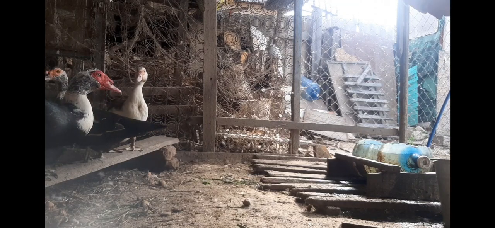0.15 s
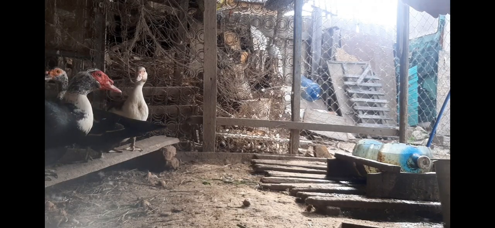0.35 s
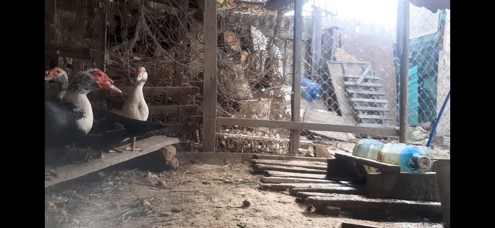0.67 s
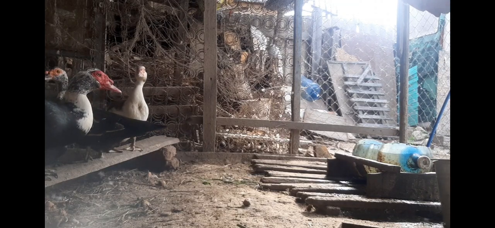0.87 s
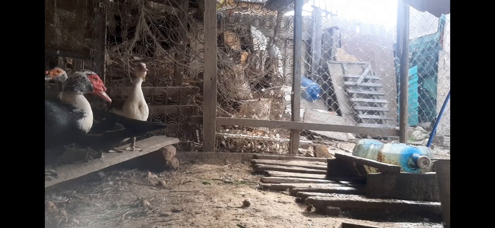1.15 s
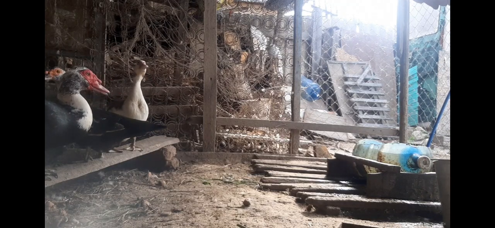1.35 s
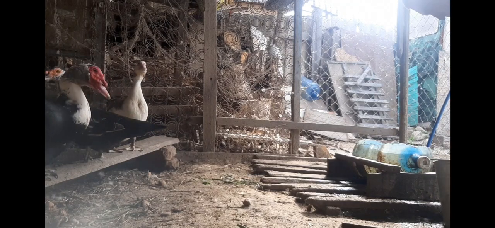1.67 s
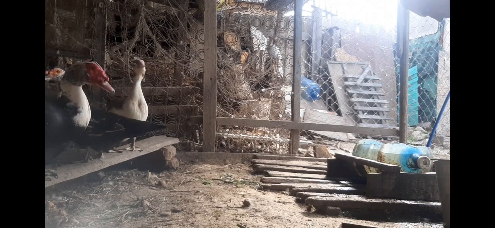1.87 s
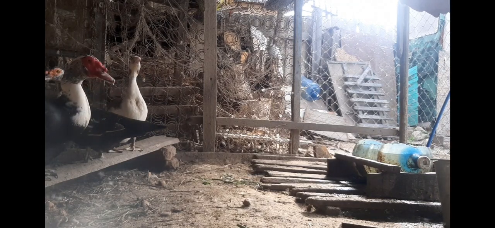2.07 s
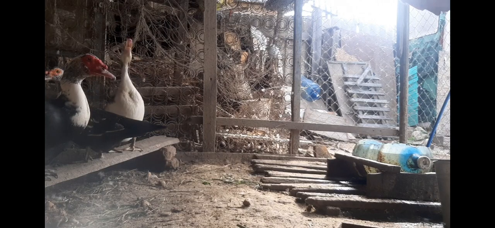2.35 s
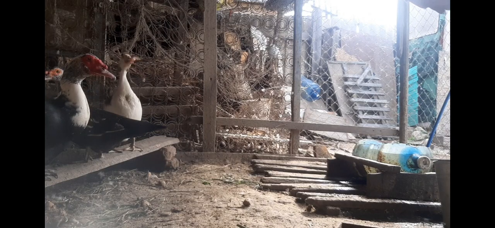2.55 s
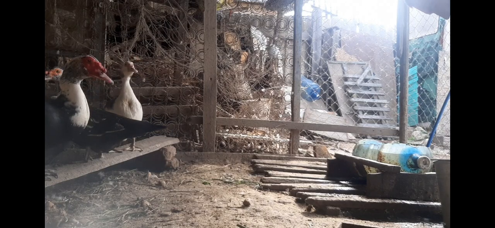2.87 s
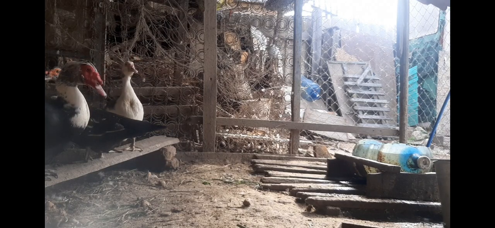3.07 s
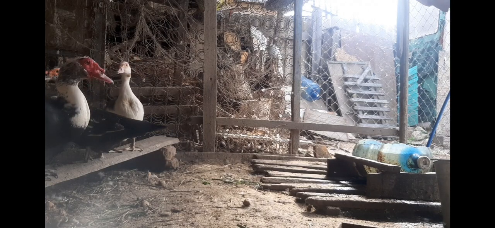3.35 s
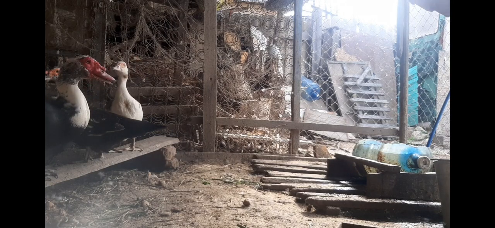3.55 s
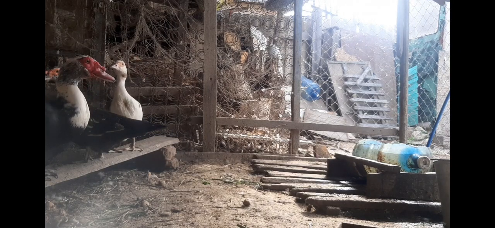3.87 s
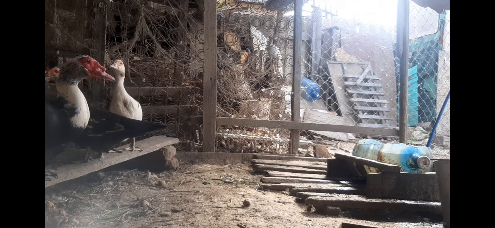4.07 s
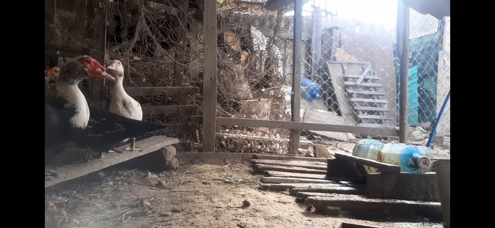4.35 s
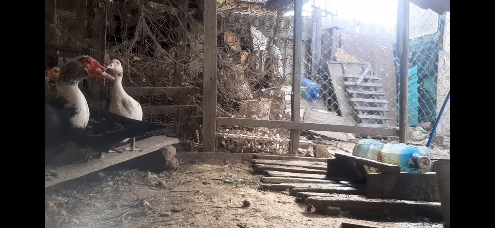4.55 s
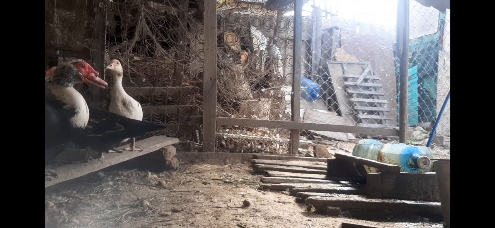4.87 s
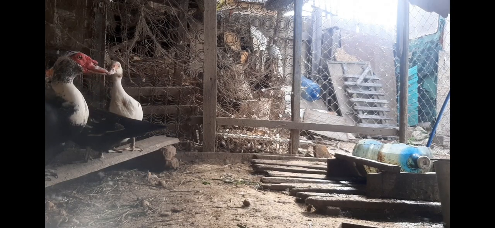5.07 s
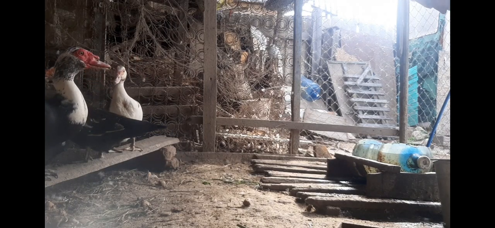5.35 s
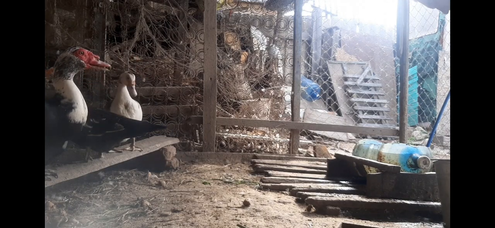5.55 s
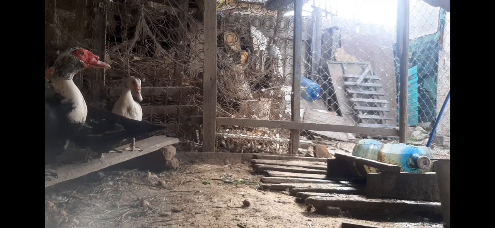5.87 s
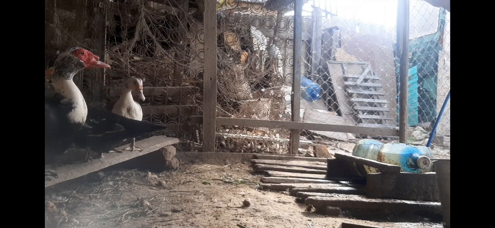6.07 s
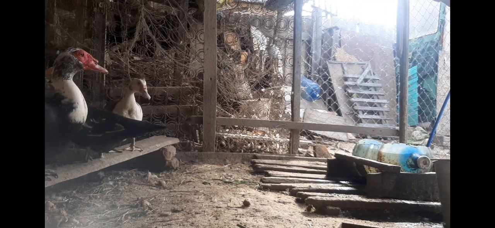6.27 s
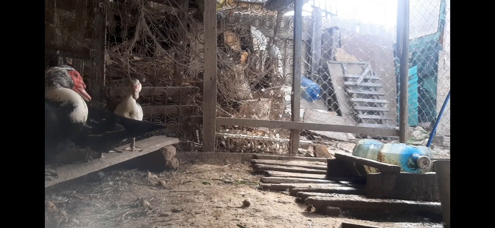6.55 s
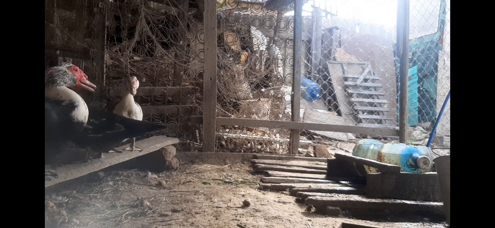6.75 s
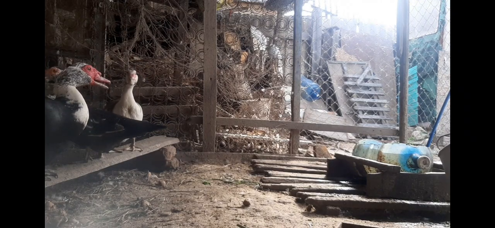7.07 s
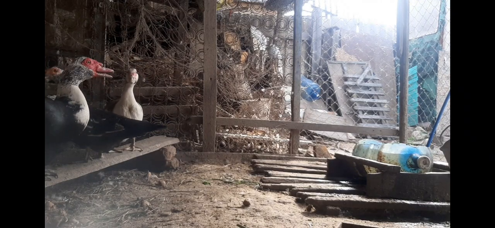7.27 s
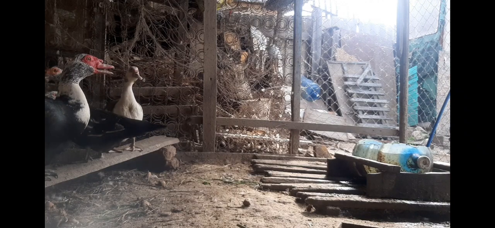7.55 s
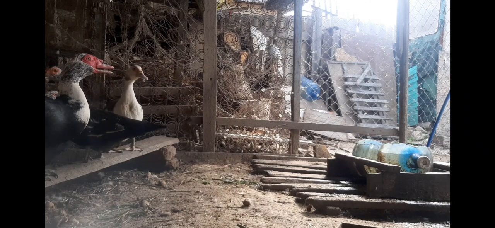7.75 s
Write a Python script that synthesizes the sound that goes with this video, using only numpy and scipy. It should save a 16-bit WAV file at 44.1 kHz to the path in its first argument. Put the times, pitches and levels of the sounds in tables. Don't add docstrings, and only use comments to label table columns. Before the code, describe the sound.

In a small wooden shed, feed is stirred in a plastic pail close to a stereo microphone, a little to the right. A hollow knock lands at once, with grainy hissing strokes through the first half second, then quieter rustling with tiny wet pops. Two dull knocks come at about 1.6 and 1.75 s, a longer gritty sweep near 2.1, and another thud with spilling grain at 2.8. Softer scrapes and digs follow from 3 to 4.5 s. A strong knock at 5.0 leads into a dense hissing scrape and firm dig until about 5.5. It thins out; a soft low footfall shakes the boards near 6.5. From 6.9 to 7.8 s the scoop taps the rim five times, roughly every 0.2 s, loudest around 7.3, the last lighter and brighter. Distant traffic rumbles throughout under very faint fowl murmur; the room tail is short and dry.

```python
import sys
import numpy as np
from scipy import signal
from scipy.fft import rfft, irfft
from scipy.io import wavfile

SR = 44100
rng = np.random.default_rng(int(sys.argv[2]) if len(sys.argv) > 2 else 0)


def natural_amplitude(level_db):
    exponent = np.asarray(level_db, float) / 20
    return 10 ** exponent


def dump_mix(stems):
    frames = np.atleast_2d(stems).T
    limited = np.clip(frames, -1, 1)
    pcm = np.round(limited * 32767).astype(np.int16)
    wavfile.write(sys.argv[1], SR, pcm)


N = 348816

# f/Hz, level/dB per Hz
AIR_SPECTRUM = [(71, -16), (120, 0.5), (228, -21), (333, -6), (726, -24), (1780, -18), (4160, 9),
                (6310, -22), (7500, -9), (9750, -51), (16500, -120)]
AIR_DB = -58
# t/s, level/dB
TRAFFIC = [(0.0, -56), (0.51, -56), (0.81, -64), (1.1, -58), (2.38, -60), (2.71, -59.5), (3.52, -55),
           (4.49, -59.5), (4.89, -56.5), (5.0, -53), (6.1, -57), (6.17, -57), (6.78, -56), (7.42, -51),
           (7.6, -52.5), (7.91, -60)]
MIDDLE_DB, UPPER_DB = -7.5, -20.5
# t/s, hold/s, middle band level/dB, upper band against it/dB
DRONES = [
    (0.1, 0.67, -58, -17),
    (1.65, 0.24, -59, -31),
    (3.5, 0.61, -69.5, -0.5),
    (4.1, 0.38, -63, -13),
    (4.85, 0.24, -59, -10),
    (5.4, 0.21, -55, -11),
    (7.1, .75, -60.5, -7.5),
]
DRONE_FADE_DB_PER_S = 58
# t/s, peak level/dB, f/Hz, t60/s
FOOTFALL = [
    (6.482, -29, 72, 0.21),
    (6.528, -36, 86, 0.33),
]

# t/s, hiss level/dB
IDLING = [(0, -60), (0.9, -60), (1.3, -60), (1.4, -66), (1.55, -63), (2.4, -64), (3.2, -63), (3.6, -63),
          (4.3, -61), (4.75, -63), (5.75, -62), (6.3, -61), (6.85, -60), (7.05, -66), (7.91, -68)]
IDLING_RASP_DB = -3
# t/s at full strength, hold/s, hiss level/dB, rasp against hiss/dB
SWEEPS = [(0.0, 0.1, -44.5, -2.5), (0.335, .11, -44, 0.5), (0.66, 0.062, -60, -16),
          (0.75, 0.023, -55.5, -1.5), (1.03, .015, -60.5, -4), (1.11, 0.033, -60, 8),
          (1.26, 0.023, -58, -5), (1.47, 0.041, -60, -17), (1.715, 0.045, -47.5, -3),
          (2.06, 0.15, -47.5, 0), (2.4, .02, -64.5, 2.5), (2.635, 0.042, -52, 0.5), (2.94, 0.05, -53, 3),
          (3.07, 0.038, -48, -3), (3.34, 0.048, -59, 2), (3.75, 0.16, -59, -1), (4.2, 0.026, -55, 1.5),
          (4.47, 0.064, -47, -4), (4.84, 0.068, -60, 3.5), (5.2, 0.32, -52, -1.5), (6.05, 0.057, -54, -4.5),
          (6.19, 0.024, -60, 1), (6.42, 0.022, -59.5, -2), (6.7, 0.019, -59.5, 7.5), (7.3, 0.018, -63, -16),
          (7.89, .03, -54.5, 10)]
SWEEP_RISE_DB_PER_S, SWEEP_FALL_DB_PER_S = 115, 195
# t/s, hold/s, hiss level/dB, rasp against hiss/dB
SPILLS = [(0.09, 0.011, -52.5, -1), (0.14, 0.15, -61.5, 13), (0.56, 0.0072, -61, -7),
          (1.605, 0.033, -52, 1), (1.8, 0.031, -55, 4), (1.885, 0.014, -57.5, 8), (2.29, 0.0063, -53.5, 0),
          (2.47, .01, -61, -22), (2.52, 0.016, -56, -24), (2.8, 0.015, -44, -1.5), (3.432, 0.062, -49.5, 4),
          (3.97, 0.056, -49.5, 1.5), (4.99, 0.069, -46.5, 0), (5.045, 0.035, -42, -1.5),
          (5.395, .11, -42, -3), (5.59, 0.02, -57.5, 4), (5.97, 0.022, -54.5, -4),
          (6.24, 0.018, -58.5, -15), (6.94, 0.033, -51.5, 3), (7.2, 0.013, -56.5, 8), (7.41, 0.016, -54, 7),
          (7.61, 0.037, -53.5, 9), (7.85, 0.032, -58, 11)]
SPILL_RISE_DB_PER_S, SPILL_FALL_DB_PER_S = 696, 143
# f/Hz, level/dB per Hz
GRAIN_SPECTRUM = [(880, -31), (1500, -4.5), (1890, -11), (2090, -7), (2880, -4.5), (3210, -4.5), (5390, -9),
                  (6920, -13.5), (7500, -22.5), (9750, -24.5), (16500, -120)]
# f/Hz, level/dB per Hz
RASP_SPECTRUM = [(76, 1), (130, -12), (351, 9.5), (884, -1), (1030, 1), (1200, -2), (1520, -4), (2200, -7),
                 (2860, -61), (4840, -120)]
# f/Hz, width/Hz, level/dB
HOLLOWS = [(415, 59, -8), (663, 59, -2), (1070, 29, -28), (1560, 22, -32), (2050, 8.7, 0.5), (2420, 38, -5),
           (2690, 38, 1)]

# t/s, thud peak level/dB, thud f/Hz, wall against thud/dB, crack against thud/dB
KNOCKS = [(0.059, -18.5, 355, -16.5, -15), (0.336, -37.5, 676, -8, 4.5), (0.535, -49, 640, 10.5, 14.5),
          (1.593, -19, 429, -43, -30), (1.752, -20, 333, -13.5, -9.5), (2.476, -71, 684, -3, 0),
          (2.78, -18, 345, -23, -14.5), (3.427, -37, 332, -6.5, -8.5), (4.984, -16, 408, -20, -19),
          (5.953, -40, 362, -11, 6), (6.915, -17.5, 415, -10, -23.5), (7.122, -10.5, 482, -9, -12),
          (7.337, -6.5, 483, -10, -18.5), (7.552, -10.5, 504, -4, -10), (7.779, -23, 1000, 11.5, -2.5)]
# t/s, thud peak level/dB, thud f/Hz, wall and crack against thud/dB
DIGS = [
    (1.094, -39.5, 412, 0.5, -4),
    (1.705, -46.5, 382, -14, 13.5),
    (2.755, -31.5, 257, -20.5, 2),
    (3.964, -40, 700, -32, 3),
    (3.985, -29, 408, -15, -25),
    (5.394, -24.5, 430, -17, -19),
]
KNOCK_RISE_S, DIG_RISE_S = 0.00034, 0.013
# f/Hz, level/dB, t60/s
WALL_MODES = [(918, -28, 0.018), (1035, -5, 0.057), (1128, -1, 0.036), (1190, -14, 0.0097),
              (1350, -9, 0.042), (1490, 6, 0.022), (1560, 11, 0.046), (1720, -2, 0.013), (2000, 13, 0.017),
              (2050, -1.5, 0.025), (2400, 3, 0.025), (2610, -52, 0.021), (2730, -44, 0.08)]
WALL_SPLIT_HZ = 1420
UPPER_WALL_SHARE, UPPER_WALL_DB = 0.22, -0.5
# f/Hz, level/dB, t60/s
BELLY_MODES = [(188, -11.5, 0.022), (292, -22, 0.16), (430, -4, 0.21), (490, -29, 0.062),
               (618, -1.5, 0.027), (684, -9.5, 0.113)]
# f/Hz, level/dB per Hz
CRACK_SPECTRUM = [(1410, -42), (2400, -33), (2880, -28.5), (3050, -15), (4000, -13.5), (4840, -10),
                  (6440, -7), (7500, -18.5), (9750, -34.5), (16500, -120)]

# t/s, peak level/dB, f/Hz
WET_POPS = [(0.725, -48.5, 690), (0.873, -50.5, 1370), (1.348, -54, 692), (2.079, -43.5, 1020),
            (2.147, -41.5, 680), (2.63, -49, 1560), (3.058, -49, 740), (3.499, -48, 1350),
            (3.876, -49, 730), (4.33, -49, 670), (4.749, -59, 1130), (5.441, -37, 1560), (5.489, -39, 1630),
            (6.038, -47.5, 1190), (6.11, -49.5, 636), (6.452, -54, 1490), (6.605, -55, 1590),
            (0.295, -40, 3260), (0.6094, -48, 2000), (1.3227, -48, 4720), (1.424, -50.5, 1980),
             (1.934, -43, 3200), (2.1185, -40.5, 2050), (2.2923, -48, 2040), (2.519, -45.5, 4090),
             (2.937, -40.5, 3300), (3.1824, -44, 2120), (3.3144, -46, 3680), (3.3528, -42, 3300),
             (3.5414, -48, 4200), (4.474, -39.5, 2200), (4.8258, -45, 4060), (5.3942, -31.5, 2370),
             (5.5998, -36, 3380), (5.6935, -44, 3210), (5.8252, -50, 3540), (5.8888, -42, 3570),
             (6.2446, -47, 4710), (1.026, -43.5, 1750), (6.7217, -35, 3180), (6.8083, -44, 2730),
             (7.2963, -44, 3540)]
POP_LEAD_S = 0.008

SHED_T60_S, SHED_DB, SHED_WIDE_HZ = 0.11, -1.5, 338
LEFT_LAG, RIM_LAG = 8, 10
# f/Hz, level/dB
RIGHT_LEAN = [(150, 3), (600, 3), (2500, 4.5), (5000, -0.27), (12000, -3)]
# f/Hz, level/dB
DIFFUSE = [(120, -29), (300, -7.5), (700, 7), (3000, 9), (12000, 20.5)]
# f/Hz, level/dB
SCENE_COLOUR = [(20, -59), (45, 1.5), (6800, 5.5), (7600, 3.5), (8500, -31.5), (9500, -12), (11000, -1),
                (15300, -3), (15900, -43), (17000, -70)]


def rms_one(x):
    return x / np.sqrt(np.mean(x ** 2) + 1e-20)


def in_time(rows):
    s, *columns = np.transpose(rows)
    return [np.interp(np.arange(N) / SR, s, c) for c in columns]


def band_filter(order, edges_hz, kind="band"):
    return signal.butter(order, edges_hz, kind, fs=SR, output="sos")


def colour(x, points):
    size = x.shape[-1]
    hz, db = np.transpose(points)
    bins_hz = np.arange(size // 2 + 1) * SR / size
    gain = natural_amplitude(np.interp(np.log(bins_hz + 1), np.log(hz), db))
    return irfft(rfft(x) * gain, size)


def drift(rate_hz):
    r = np.exp(-80 * np.pi * rate_hz / SR)
    noise = rng.standard_normal(N // 40 + 2002)
    slow = signal.lfilter([1], [1, -2 * r, r * r], noise)[2000:]
    return np.interp(np.arange(N) / 40, np.arange(len(slow)), rms_one(slow))


def ring(clicks, hz, t60):
    r, w = natural_amplitude(-60 / (t60 * SR)), 2 * np.pi * hz / SR
    return signal.lfilter([0, np.sin(w)], [1, -2 * r * np.cos(w), r * r], clicks + 1e-18)


def swells(rows, rise_db_per_s, fall_db_per_s):
    s, hold, db, second_db = np.transpose(rows)[:, :, None]
    t = np.arange(0, N, 32) / SR
    rise_db = rise_db_per_s * np.maximum(s - t, 0)
    fall_db = fall_db_per_s * np.maximum(t - s - hold, 0)
    first_db = db - rise_db - fall_db
    powers = [np.sum(natural_amplitude(2 * d), axis=0) for d in (first_db, first_db + second_db)]
    return np.array([np.interp(np.arange(N) / SR, t, p) for p in powers])


def direct(x, lag=LEFT_LAG):
    return np.stack([np.roll(x, lag), x])


def with_diffuse(x):
    return direct(x) + colour(rng.standard_normal((2, N)), DIFFUSE)


def yard():
    air = colour(with_diffuse(rng.standard_normal(N)), AIR_SPECTRUM[:-2])
    murmur = 0
    for hz in np.geomspace(600, 5400, 18):
        opening = np.clip(drift(14) - 0.6, 0, 1.4)
        murmur = murmur + opening * rms_one(ring(rng.standard_normal(N), hz, 0.012))
    return natural_amplitude(AIR_DB - 3) * rms_one(air) + natural_amplitude(AIR_DB - 8) * direct(murmur)


def rumble():
    bands_hz = [(43.2, 59.7), (76.4, 102.7), (130, 164), (40, 156)]
    noise = rng.standard_normal((4, N + SR))
    *bands, side = [rms_one(signal.sosfilt(band_filter(2, hz), n)[SR:]) for hz, n in zip(bands_hz, noise)]
    deep_db, = in_time(TRAFFIC)
    steady = natural_amplitude(2 * (deep_db + [[MIDDLE_DB], [UPPER_DB]]))
    drone = swells(DRONES, DRONE_FADE_DB_PER_S, DRONE_FADE_DB_PER_S)
    levels_db = [deep_db, *10 * np.log10(steady + drone)]
    low = sum(natural_amplitude(db) * band for db, band in zip(levels_db, bands))
    step = sum(natural_amplitude(db) * ring(np.arange(N) == round(s * SR), hz, t60) for s, db, hz, t60 in FOOTFALL)
    low += signal.sosfilt(band_filter(3, 125, "low"), step)
    return low * natural_amplitude([[-1.2], [1.1]]) + natural_amplitude(levels_db[1] - 14) * side * [[1], [-1]]


def hand():
    power = natural_amplitude(2 * (in_time(IDLING)[0] + [[0], [IDLING_RASP_DB]]))
    power = power + swells(SWEEPS, SWEEP_RISE_DB_PER_S, SWEEP_FALL_DB_PER_S)
    power = power + swells(SPILLS, SPILL_RISE_DB_PER_S, SPILL_FALL_DB_PER_S)
    return 10 * np.log10(power)


def grains(per_s, spread_db):
    sizes = natural_amplitude(spread_db * np.minimum(rng.exponential(1, N), 5)) * rng.choice([-1, 1], N)
    return rms_one(sizes * (rng.random(N) < per_s / SR))


def grain_hiss():
    slide = colour(with_diffuse(grains(6000, spread_db=5.5)), GRAIN_SPECTRUM[:-2])
    edges = np.geomspace(1200, 16500, 7)
    hiss = sum(natural_amplitude(1.2 * drift(30)) * signal.sosfilt(band_filter(1, band), slide)
               for band in zip(edges, edges[1:]))
    return rms_one(hiss)


def wall_rasp():
    drag = with_diffuse(grains(2000, spread_db=3.0))
    hollow = 0
    for k, (hz, width, db) in enumerate(HOLLOWS):
        answer = rms_one(ring(drag * natural_amplitude(4 * drift(12)), hz, 2.5 / width))
        hollow = hollow + natural_amplitude(db) * (-1) ** k * answer
    return rms_one(colour(drag, RASP_SPECTRUM)) + natural_amplitude(-6.5) * rms_one(hollow)


def stir():
    hiss_db, rasp_db = hand()
    clump, flutter = drift(34), drift(33)
    hiss = natural_amplitude(hiss_db + 3.0 + 0.31 * clump + 1.53 * flutter) * grain_hiss()
    return hiss + natural_amplitude(rasp_db - 4.0 + 0.34 * clump + 0.65 * flutter) * wall_rasp()


def shed(x):
    t = np.arange(len(x)) / SR
    onset = np.clip((t - 0.002) / 0.006, 0, 1)
    tail = rng.standard_normal((3, len(t))) * natural_amplitude(-60 * t / SHED_T60_S) * onset
    low, high = [band_filter(1, SHED_WIDE_HZ, kind) for kind in ("low", "high")]
    tail = signal.sosfilt(low, tail[0]) + signal.sosfilt(high, tail[1:])
    tail = natural_amplitude(SHED_DB) * tail / np.sqrt(np.sum(tail ** 2, axis=1, keepdims=True))
    return direct(x, RIM_LAG) + signal.fftconvolve(x[None], tail, axes=1)[:, :len(x)]


def blow(hz, db, lower_db, crack_db, rise_s):
    t = np.arange(SR // 4) / SR
    rise = 1 - np.exp(-t / rise_s)
    luck, noise = rng.normal(0, 2, 24), rng.standard_normal((4, len(t)))
    contact = noise[0] * rise * (natural_amplitude(-60 * t / 0.045) + 3.1 * natural_amplitude(-60 * t / 0.016))
    thud = ring(t == 0, hz, 0.041) * (1 - np.exp(-t / (rise_s + 0.00082)))
    belly = rms_one(sum(natural_amplitude(d + k) * ring(contact, f, 0.56 * t60)
                        for (f, d, t60), k in zip(BELLY_MODES, luck)))
    modes = [(f, natural_amplitude(d + k) * ring(contact, f, 0.55 * t60))
             for (f, d, t60), k in zip(WALL_MODES, luck[8:])]
    rattle = 2.47 * rise * natural_amplitude(-60 * t / 0.14)
    lower_rattle = rattle * rms_one(signal.sosfilt(band_filter(1, (750, 990)), noise[1]))
    upper_rattle = rattle * rms_one(signal.sosfilt(band_filter(1, (1450, 3100)), noise[2]))
    lower = rms_one(sum(m for f, m in modes if f < WALL_SPLIT_HZ)) + lower_rattle
    upper = rms_one(sum(m for f, m in modes if f > WALL_SPLIT_HZ)) + upper_rattle
    upper_db = UPPER_WALL_DB + crack_db + UPPER_WALL_SHARE * (lower_db - crack_db)
    spray = rise * (natural_amplitude(-60 * t / 0.088) + 0.51 * natural_amplitude(-60 * t / 0.017))
    crack = rms_one(colour(noise[3], CRACK_SPECTRUM[:-2])) * spray
    hit = natural_amplitude(db - 7.5) * thud
    hit += natural_amplitude(db + 0.3 * lower_db - 26.5) * belly
    hit += natural_amplitude(db + lower_db - 24.5) * lower
    hit += natural_amplitude(db + upper_db - 18) * upper
    hit += natural_amplitude(db + crack_db - 0.5) * crack
    return signal.sosfilt(band_filter(3, 175, "high"), hit)


def knocks(events, rise_s):
    out = np.zeros((2, N + SR))
    for s, db, hz, lower_db, crack_db in events:
        hit = shed(blow(hz, db, lower_db, crack_db, rise_s))
        out[:, round(s * SR):][:, :hit.shape[1]] += hit
    return out[:, :N]


def pops():
    out, t = np.zeros(N + SR), np.arange(SR // 10) / SR
    swell = t / 0.0049 * np.exp(1 - t / 0.01)
    for s, db, hz in WET_POPS:
        breath = rms_one(ring(rng.standard_normal(len(t)), hz, 0.014))
        out[round((s - POP_LEAD_S) * SR):][:len(t)] += natural_amplitude(db - 11.5) * swell * breath
    return direct(out[:N])


def scene():
    scoop = knocks(KNOCKS, KNOCK_RISE_S) + knocks(DIGS, DIG_RISE_S)
    left, right = yard() + stir() + scoop + pops()
    return np.stack([left, colour(right, RIGHT_LEAN)]) * natural_amplitude(-2.5) + rumble()


def low_pass(x):
    return signal.sosfilt(signal.butter(12, 16810, fs=SR, output="sos"), x)


def record(dry):
    mix = colour(dry, SCENE_COLOUR)
    return low_pass(mix)


dry = scene()
out = record(dry)
dump_mix(out)
```